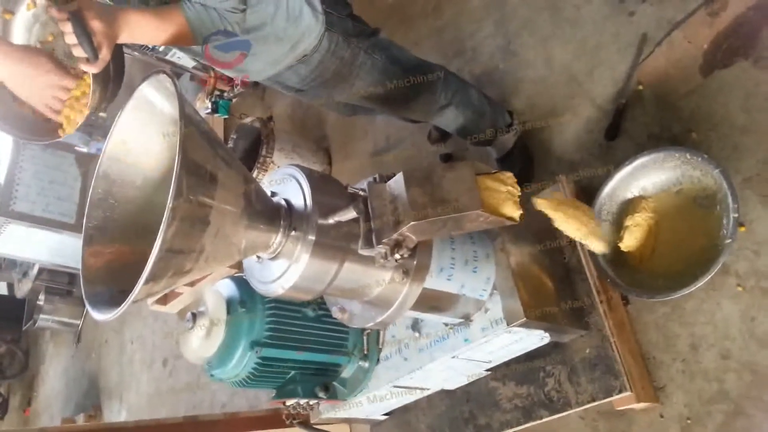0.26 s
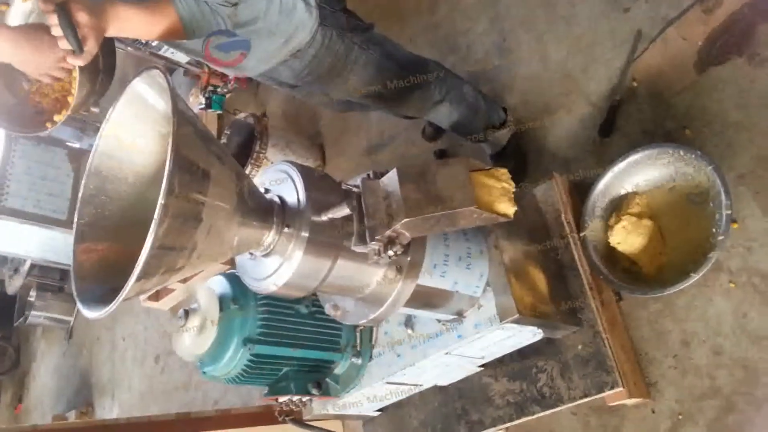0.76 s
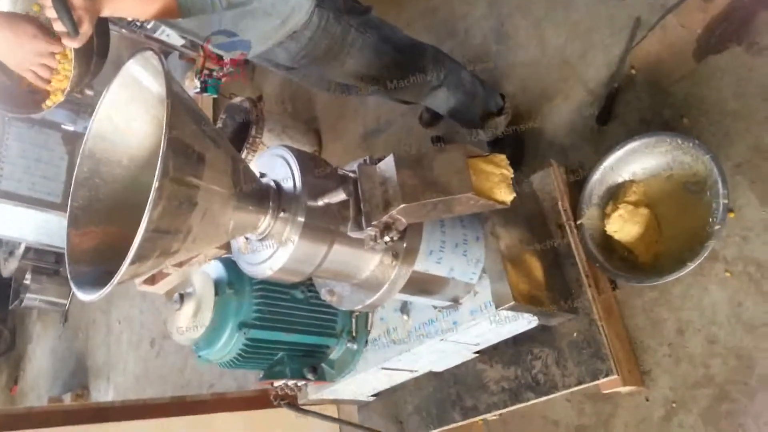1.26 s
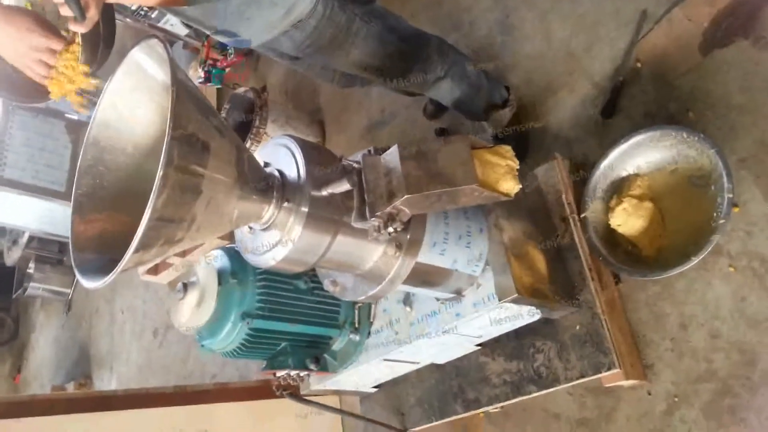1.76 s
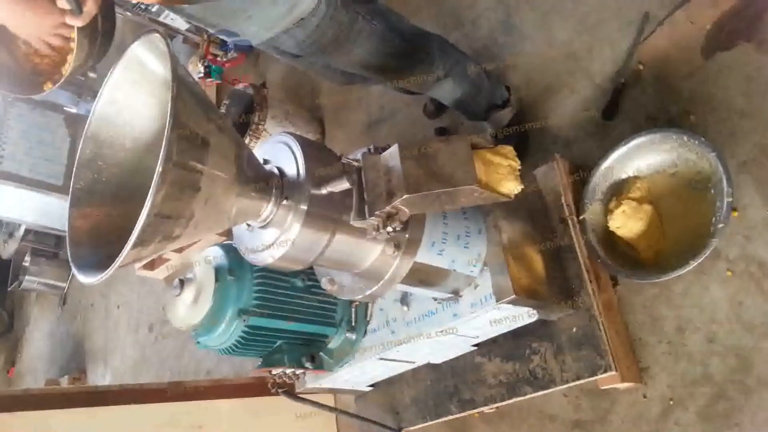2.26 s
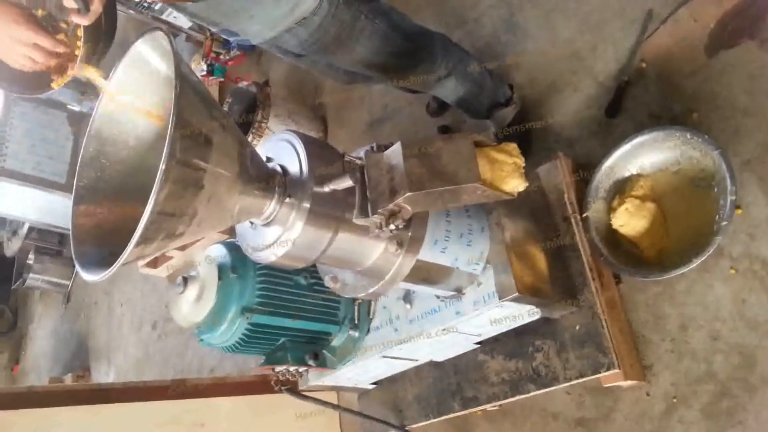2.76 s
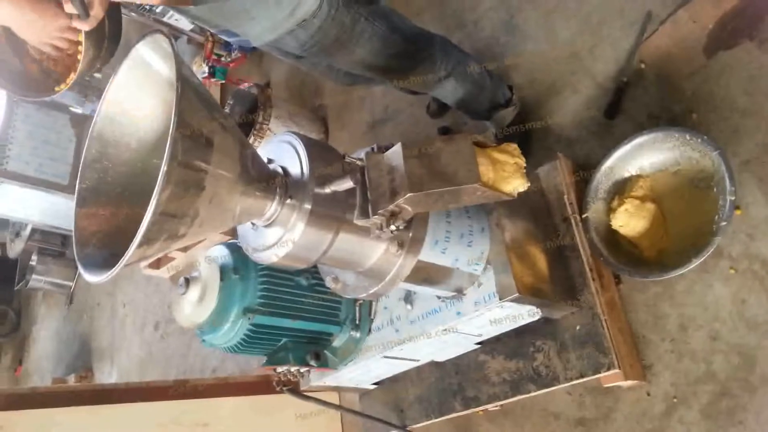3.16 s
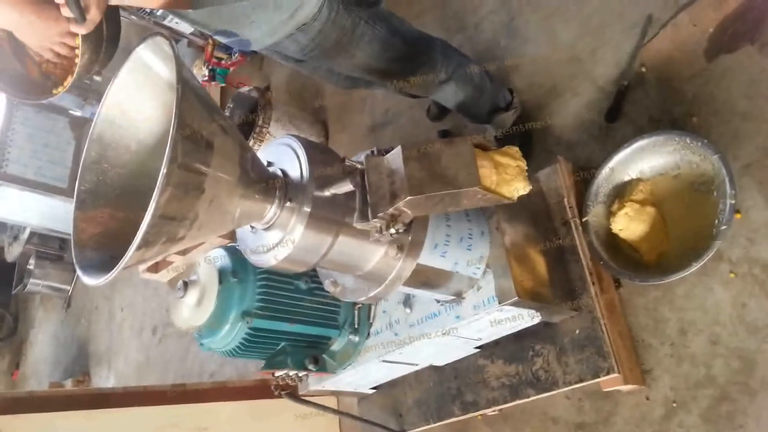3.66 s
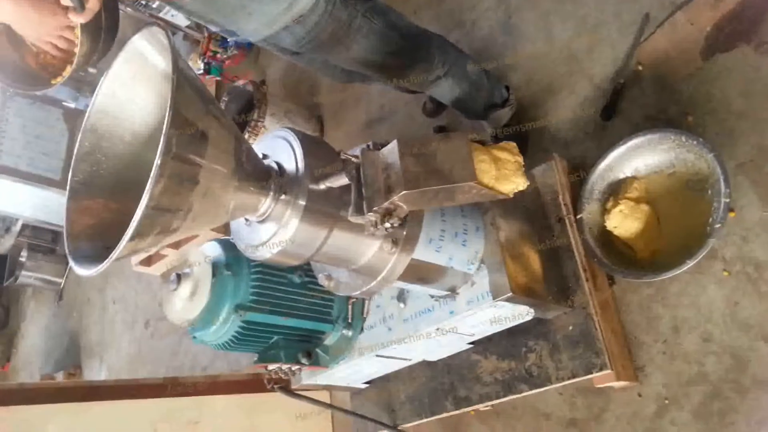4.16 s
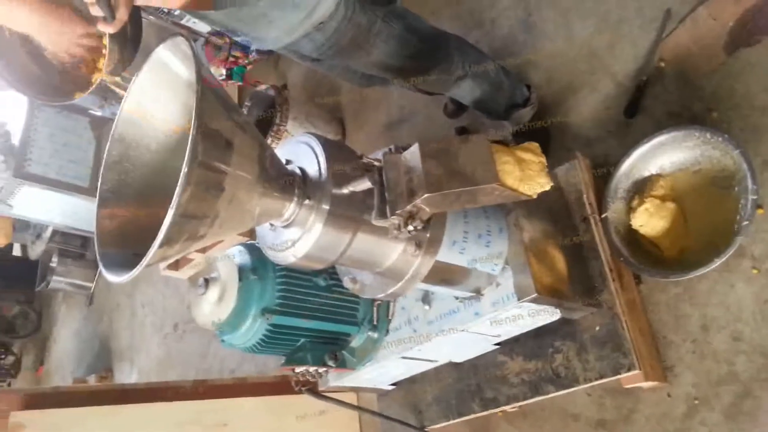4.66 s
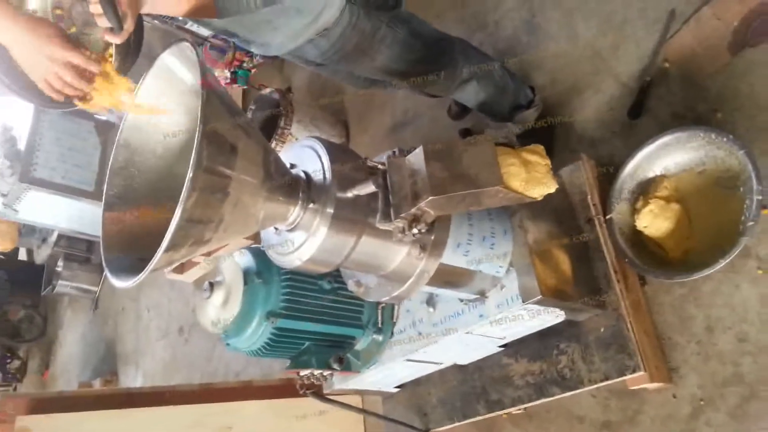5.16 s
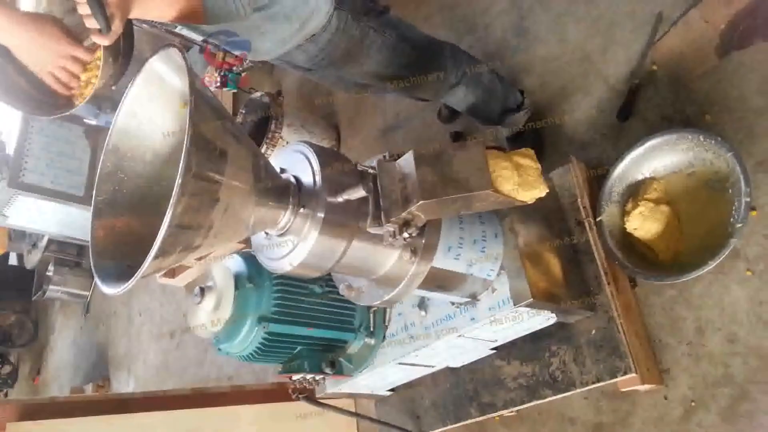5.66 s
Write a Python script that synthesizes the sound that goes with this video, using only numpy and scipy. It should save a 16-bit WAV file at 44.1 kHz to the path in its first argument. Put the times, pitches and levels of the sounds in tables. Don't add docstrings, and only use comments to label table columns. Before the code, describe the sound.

A small electric disc mill is already at full speed and grinds soaked corn for about six seconds without stopping. A dense, grainy rush of breaking kernels fills the middle range, with sharp fizz around 6 to 8 kilohertz, fluttering quickly with the shaft. Corn thrown into the steel hopper makes brief hollow rattles, heaviest at 0.6 to 0.8 seconds, softer around 1.2, 1.6, 2.1 and 2.9, stronger again at 4.5, 5.4 and 5.8. The motor hums near 245 hertz, swelling around 4 to 4.6, with a rough tone near 1.4 kilohertz rising under load, notably 2.6 to 3.2. A shrill 7 kilohertz whine is strong at 2.3 to 2.9, nearly vanishes around 4 to 4.6, then returns; a thinner whistle above 9 kilohertz comes and goes. Faint fixed electronic whistles sit behind. Pitch sags slightly under load. Close, dry workshop phone pickup, low sounds central, highs wide and brighter right.

```python
import sys
import numpy as np
from scipy import signal
from scipy.fft import rfft, irfft, next_fast_len
from scipy.io import wavfile
from scipy.ndimage import uniform_filter1d, map_coordinates

SR = 44100
rng = np.random.default_rng(int(sys.argv[2]) if len(sys.argv) > 2 else 0)


def unload_audio(sound):
    columns = np.transpose(np.atleast_2d(sound))
    steps = np.round(np.clip(columns, -1, 1) * 32767)
    wavfile.write(sys.argv[1], SR, steps.astype(np.int16))


def boost_factor(decibels):
    exponent = np.asarray(decibels, float) / 20
    return 10 ** exponent


N = 261513

SLOTS = 28
TONE_FALL_S = 0.05


# (time [s], length [s], level over the steady rattle [dB])
POURS = [(0.04, 0.01, 4.5), (.29, 0.025, 3), (0.604, 0.055, 8.5), (.71, 0.11, 13), (1.197, 0.14, 0.5),
         (1.547, 0.24, 4), (2.055, 0.1037, 4), (2.89, .2, 3.5), (3.276, 0.015, 4), (4.115, 0.0268, -0.5),
         (4.45, .12, 7), (4.661, 0.015, 8), (5.37, .1, 7), (5.83, .03, 5)]
# (centre [Hz], width [Hz], level [dB])
HOPPER_MODES = [(152, 9, -10.5), (263, 36.5, 0), (341, 14.2, 2.5), (407.5, 29, -3.5)]
# (centre [Hz], width [Hz], level [dB])
CHUTE_MODES = [(480, 47, -7.5), (535, 32.6, 2.5), (664, 85.77, -3), (980, 670, -13), (1960, 350, -16.5)]
# (frequency [Hz], level [dB])
RUMBLE_COLOUR = [(20, -26), (60, -32), (110, -12), (150, -9.5), (220, -12), (350, -16), (520, -9.5),
                 (900, -42.5)]
# (frequency [Hz], level [dB])
BODY_LEFT_COLOUR = [(400, -20), (800, -6), (1400, 1), (2200, -2.5), (3200, -5.5), (4500, -7.5), (5600, -1),
                    (7000, -55)]
# (frequency [Hz], level [dB])
BODY_RIGHT_COLOUR = [(400, -13), (800, -8), (1400, -9.5), (2600, -4.5), (3400, -10), (4500, -9), (5600, -5),
                     (7000, -20)]
# (frequency [Hz], level [dB])
FIZZ_LEFT_COLOUR = [(4400, -25.5), (5800, -12), (6800, -2.5), (7300, -19), (9000, -16.5), (11000, -18.5),
                    (12500, -46), (14600, -52)]
# (frequency [Hz], level [dB])
FIZZ_RIGHT_COLOUR = [(4400, -35), (5800, -24), (6400, -4.5), (6800, 1.5), (7700, 0.5), (8600, -10.5),
                     (11800, -20), (14600, -24)]


def crushing(turns):
    poured = swells(POURS, fall_s=0.1)
    rumble_db = law(-26, 1.5, -0.03, wander_db=0.5, rate=15) + 0.35 * poured
    rattle_db = law(-31, 0.16, 0.0232, wander_db=-1.5, rate=15) + poured
    body_db = law(-26.5, 0.035, 0.0067, wander_db=0.82, rate=16) + 0.16 * poured
    fizz_db = law(-24.5, 0.947, 0.03, wander_db=1.05, rate=16) + 0.064 * poured
    surge_db = 0.6 * wobble(17)

    beat = 1 + 0.063 * np.cos(2 * np.pi * turns) + 0.11 * np.cos(2 * np.pi * 2 * turns)

    def hopper(hz):
        return boost_factor(along(RUMBLE_COLOUR, hz)) + boost_factor(6) * np.abs(resonances(HOPPER_MODES)(hz))

    def housing(hz):
        return boost_factor([along(BODY_LEFT_COLOUR, hz), along(BODY_RIGHT_COLOUR, hz)])

    def gap(hz):
        return boost_factor([along(FIZZ_LEFT_COLOUR, hz), along(FIZZ_RIGHT_COLOUR, hz)])

    rumble = unit(filtered(rush(patchy_db=0.5), hopper)) * boost_factor([[1.2], [-1.2]])
    rattle = rush(patchy_db=1.0) * (1 + 0.6 * kernels(rate=90, spread_db=2))
    rattle = unit(filtered(rattle, resonances(CHUTE_MODES)))
    body = rush(patchy_db=1.0) * (2 + 0.39 * kernels(rate=150, spread_db=3)) * beat
    body = unit(filtered(body, housing))
    fizz = rush(patchy_db=1.5) * (1.5 + 0.29 * kernels(rate=250, spread_db=4)) * beat
    fizz = unit(filtered(fizz, gap))

    low = boost_factor(rumble_db + 1.5) * rumble + boost_factor(rattle_db - 2.0 + surge_db) * rattle
    high = boost_factor(body_db + 5.0 + surge_db) * body + boost_factor(fizz_db + 6.0 + surge_db) * fizz
    return low + high


def kernels(rate, spread_db):
    dies_s = 0.004
    hits = rng.random(N) < rate / SR
    blows = hits * boost_factor(spread_db * np.minimum(rng.exponential(size=N), 2.5))
    return unit(signal.lfilter([1], [1, -np.exp(-1 / (dies_s * SR))], blows))


# (frequency [Hz], left-right likeness [0..1])
ALIKE = [(30, 0.5), (130, 0.92), (280, 0.98), (620, 0.72), (1300, 0.093), (14000, 0.035)]


def rush(patchy_db):
    grid = signal.stft(rng.standard_normal((2, N)), nperseg=512)[2]
    patches = uniform_filter1d(rng.standard_normal(grid.shape[1:]), size=6, axis=0)
    patches = uniform_filter1d(patches, size=10, axis=1)
    pair = signal.istft(grid * boost_factor(patchy_db * unit(patches)), nperseg=512)[1][:, :N]

    def mid_side(hz):
        angle = np.arccos(np.clip(along(ALIKE, hz), -1, 1)) / 2
        return np.array([np.cos(angle), np.sin(angle)])

    mid, side = filtered(pair, mid_side)
    left_late = 11
    return np.array([np.roll(mid + side, left_late), mid - side])


# (time [s], whine level [dB])
BITE = [(0, -18.5), (.12, -14.5), (.42, -17), (.6, -23), (.9, -16), (1.27, -21.5), (1.62, -18), (2.25, -14),
        (2.85, -12), (2.98, -22), (3.15, -13.5), (3.78, -17), (4.0, -38), (4.22, -22), (4.36, -38),
        (4.6, -36), (4.72, -20), (5.75, -16.5)]
# (time [s], length [s], level over their rest [dB])
SINGS = [(0, 0.11, 17), (.36, 0.3597, 15.5), (.95, 0.35, 21), (1.4, .24, 18), (1.95, 0.0684, 8),
         (2.95, 0.071, 16), (3.45, 0.1767, 2.5), (3.82, 0.29, 16.5), (4.28, 0.35, 19.5), (5.08, 0.22, 18.5),
         (5.45, 0.0887, 16), (5.72, 0.0945, 13)]
WOBBLE_ORDERS = [-4, -2, -1, 0, 1, 2]
WOBBLE_DB = [-9, -4, -7, 3, -11, -13.5]


def teeth(turns):
    inner_teeth, outer_teeth = 140, 190
    inner_db = curves(BITE)[0] + 0.81 * wobble(15)
    outer_db = law(-48, 0.3, -0.04, wander_db=-3.5, rate=17) + swells(SINGS, TONE_FALL_S)
    inner, outer = 0, 0
    for k, db in zip(WOBBLE_ORDERS, WOBBLE_DB):
        inner_line = tone((inner_teeth + k) * turns, rough=0.69, rate=70, lag=1.4)
        inner = inner + boost_factor(db + 2.04 * wobble(8)) * inner_line
        outer = outer + boost_factor(db) * tone((outer_teeth + k) * turns, rough=0.47, rate=70)
    octave = boost_factor(-27) * tone(2 * inner_teeth * turns, rough=1.5, rate=250)
    inner_whine = boost_factor(inner_db - 4.0) * (boost_factor([[-11], [0]]) * inner + octave)
    outer_whine = boost_factor(outer_db - 2.5) * boost_factor([[-9], [0]]) * outer
    return inner_whine + outer_whine


# (time [s], hum level [dB])
SHAKE = [(0, -21.5), (.16, -31), (.3, -20), (.66, -22.5), (.96, -26.5), (1.27, -18), (1.68, -26),
         (1.95, -20), (2.3, -25.5), (2.9, -26.5), (3.05, -25.5), (3.4, -25.5), (3.75, -26.5), (4.08, -15),
         (4.22, -18.5), (4.56, -15), (4.75, -20), (5.93, -26.5)]
# (time [s], length [s], level over the usual slot tone [dB])
STRAINS = [
    (.1, 0.026, 7.5),
    (.36, .05, 5),
    (.78, 0.17, 7),
    (1.08, 0.32, 5),
    (1.55, 0.046, 4.5),
    (2.37, 0.048, 9.5),
    (2.62, 0.5348, 7),
    (3.26, .35, 5.5),
    (4.9, 0.55, 3.5),
    (5.62, 0.1587, 6),
]
HUM_ORDERS = [1, 2, 3, 4, 5, 6, 10]
HUM_DB = [-32, -27.5, -16.5, -12.5, 1.5, -6.5, -18.5]


def motor(turns):
    hum_db = curves(SHAKE)[0]
    slot_db = law(-34.5, -3, 0.028, wander_db=1.2, rate=13) + swells(STRAINS, TONE_FALL_S)
    hum = 0
    for k, db in zip(HUM_ORDERS, HUM_DB):
        hum = hum + boost_factor(db) * tone(k * turns, rough=0.18, rate=14, lag=-0.22)
    slot = tone(SLOTS * turns, rough=0.6, rate=36)
    return boost_factor(hum_db) * boost_factor([[0], [-2.6]]) * hum + boost_factor(slot_db) * boost_factor([[0], [-3]]) * slot


LOW_HZ = [3748, 3850, 3949, 4049, 4140]
# (left level [dB], right level [dB])
LOW_TONES = [(-51, -41), (-54, -46), (-46, -43), (-60, -49), (-54, -62)]
HIGH_HZ = [7197, 7499, 7602, 7998, 8170, 8230]
# (left level [dB], right level [dB])
HIGH_TONES = [(-22, 0), (-22, -4), (-21, -4), (-20, 2.5), (-28, -11), (-28, -11)]
SHIFT_HZ = [3749, 3949]


def drive(turns):
    shifted_db = law(-27, 0.45, -0.061, wander_db=1.2, rate=11)
    switch_db = law(-36, 5.5, -0.22, wander_db=1.2, rate=9)
    t = np.arange(N) / SR
    low, high, shifted = 0, 0, 0
    for hz, (left, right) in zip(LOW_HZ, LOW_TONES):
        low = low + boost_factor([[left], [right]]) * tone(hz * t, rough=0.46, rate=8)
    for hz, (left, right) in zip(HIGH_HZ, HIGH_TONES):
        high = high + boost_factor([[left], [right]]) * tone(hz * t, rough=0.35, rate=12, lag=2.8)
    for hz, db in zip(SHIFT_HZ, [0, -9]):
        shifted = shifted + boost_factor(db) * tone(SLOTS * turns + hz * t, rough=0.37, rate=24)
    return low + boost_factor(switch_db) * high + boost_factor(shifted_db) * boost_factor([[0], [-15]]) * shifted


def tone(cycles, rough, rate, lag=1.05):
    wander = 1 + rough * (wobble(rate) + 1j * wobble(rate))
    start = rng.uniform(0, 2 * np.pi)
    wave = wander * np.exp(1j * (2 * np.pi * cycles + start))
    return np.array([unit(wave.real), unit((wave * np.exp(-1j * lag)).real)])


def swells(rows, fall_s):
    t = np.arange(N) / SR
    rise_s = 0.065
    return sum(db * np.interp(t - s, [-rise_s, 0, hold, hold + fall_s], [0, 1, 1, 0])
               for s, hold, db in rows)


def wobble(rate):
    return map_coordinates(rng.standard_normal(N // 40), [np.arange(N) * rate / SR], order=1)


def resonances(modes):
    def response(f):
        total = 0
        for k, (centre, width, db) in enumerate(modes):
            damping = 1j * f * width
            total = total + (-1) ** k * boost_factor(db) * damping / (centre * centre - f * f + damping)
        return total
    return response


def filtered(x, response):
    m = next_fast_len(N + SR // 2)
    return irfft(rfft(x, m) * response(np.fft.rfftfreq(m, 1 / SR)), m)[..., :N]


def along(points, hz):
    f, v = np.transpose(points)
    return np.interp(np.log(hz + 1), np.log(f + 1), v)


def curves(rows):
    s, *cols = np.transpose(rows)
    return [np.interp(np.arange(N) / SR, s, c) for c in cols]


def unit(x):
    return x / np.sqrt(np.mean(x ** 2) + 1e-20)


# (time [s], speed [turns/s])
SPEED = [(0, 48.85), (.2, 49.4), (.57, 49.3), (.8, 48.35), (1.22, 49.52), (1.5, 48.82), (1.97, 49.37),
         (2.15, 48.55), (2.7, 48.08), (3.1, 48.8), (3.3, 48.36), (3.75, 48.75), (3.95, 49.68),
         (4.62, 49.73), (4.82, 48.92), (5.3, 49.25), (5.6, 48.72), (5.85, 49.1)]


def law(usual_db, per_speed, per_bite, wander_db, rate):
    faster = curves(SPEED)[0] - 49
    harder = curves(BITE)[0] + 22
    return usual_db + per_speed * faster + per_bite * harder + wander_db * wobble(rate)


def scene():
    turns = np.cumsum(curves(SPEED)[0]) / SR
    return crushing(turns) + teeth(turns) + motor(turns) + drive(turns)


def band_limit(x):
    return signal.sosfilt(signal.butter(12, 14580, fs=SR, output="sos"), x)


def record(dry):
    soft = dry / (1 + np.abs(dry / 0.9) ** 6) ** (1 / 6)
    return band_limit(soft)


dry = scene()
out = record(dry)
unload_audio(out)
```